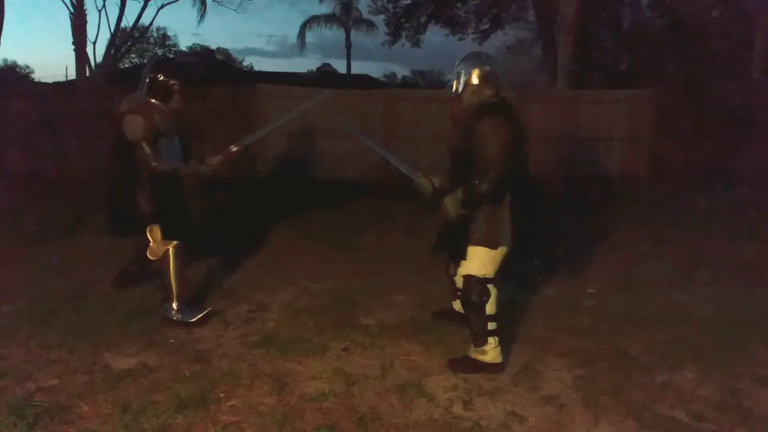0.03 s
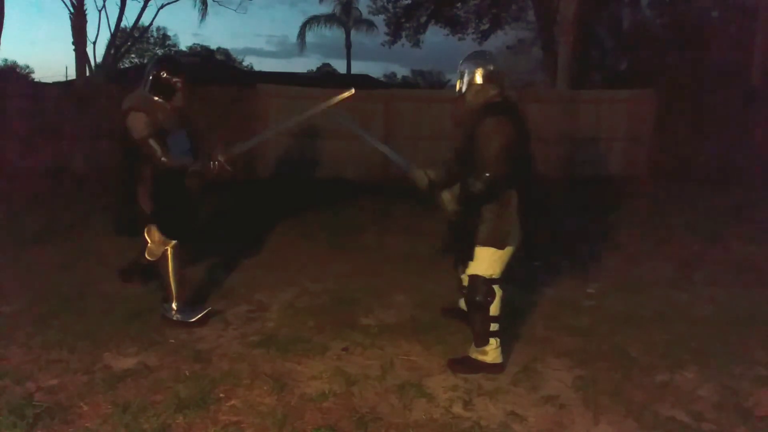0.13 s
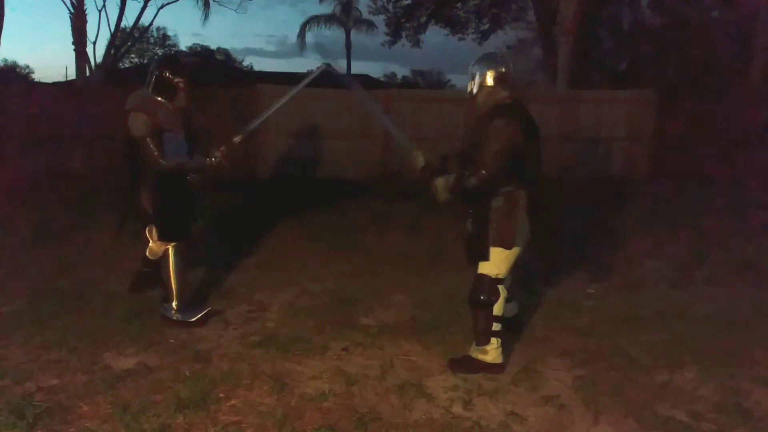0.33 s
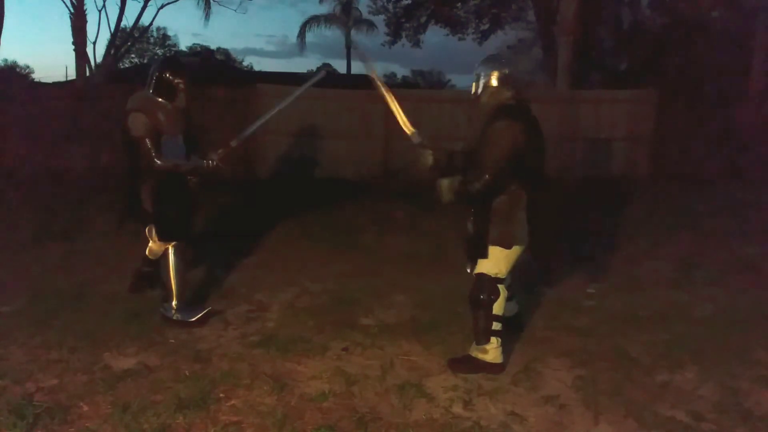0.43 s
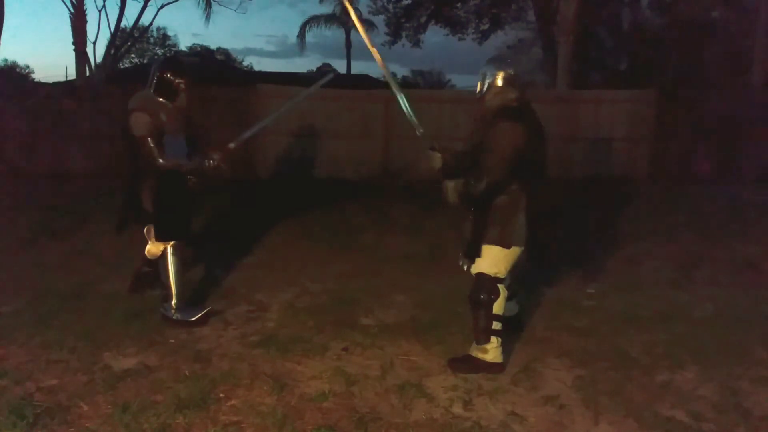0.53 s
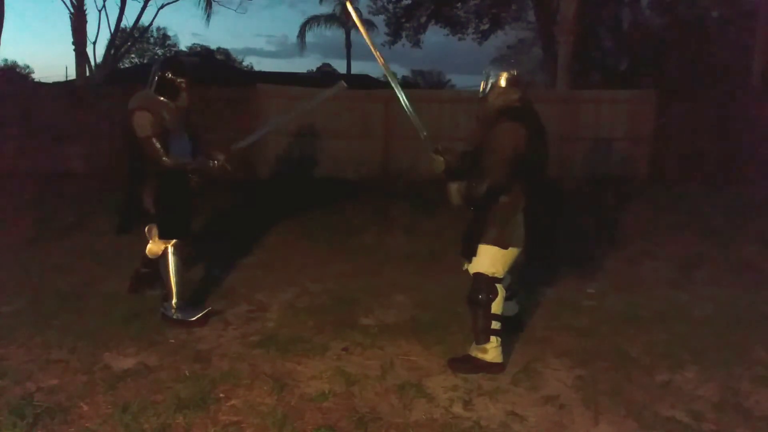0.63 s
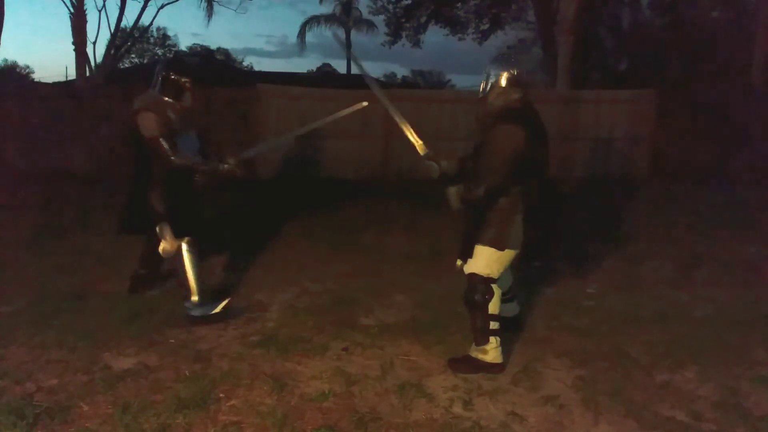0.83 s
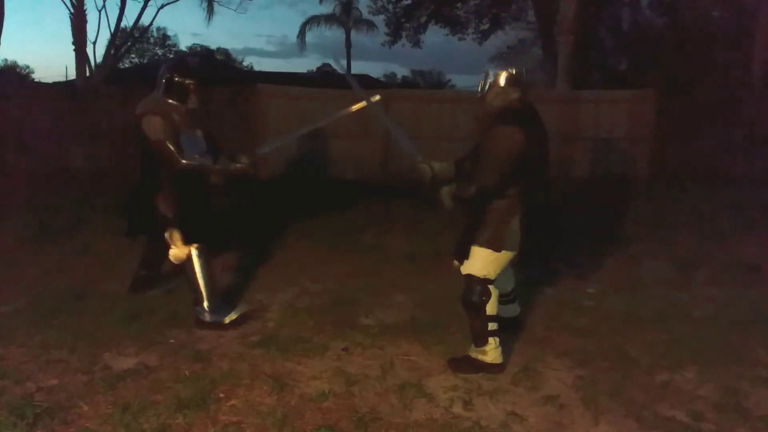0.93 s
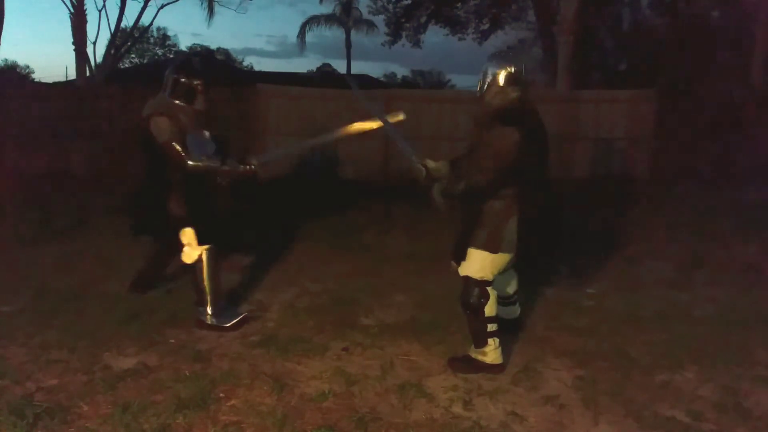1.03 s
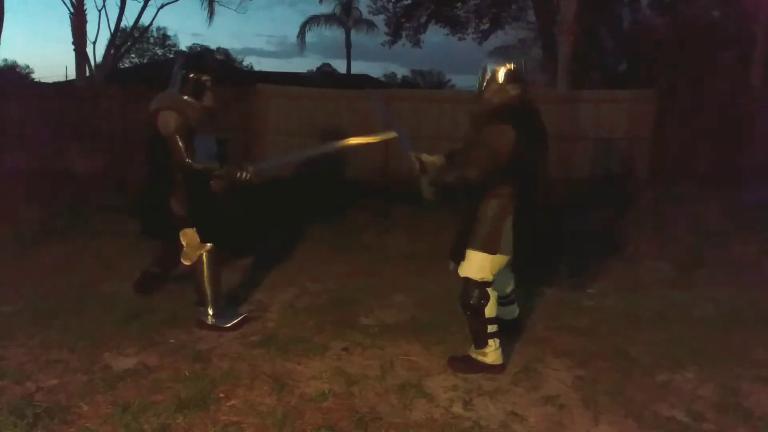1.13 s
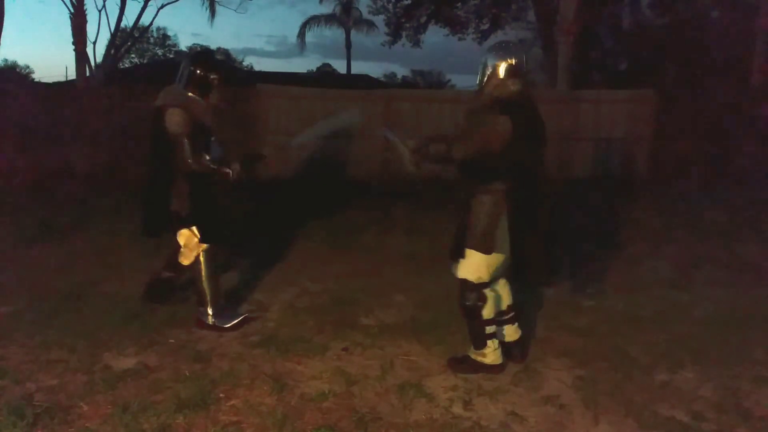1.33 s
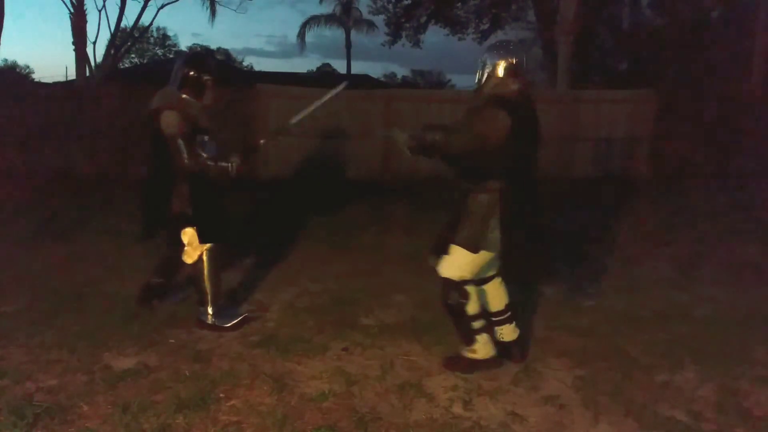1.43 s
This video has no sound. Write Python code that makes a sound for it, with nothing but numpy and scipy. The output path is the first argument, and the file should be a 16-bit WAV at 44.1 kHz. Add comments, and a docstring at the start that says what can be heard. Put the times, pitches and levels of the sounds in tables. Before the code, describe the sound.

Steel swords clash, slide edge on edge and ring, then clash again and grind briefly. Armour plates clink, mail jingles and feet scuff grass faintly, with a short echo in a quiet backyard.

```python
"""Two armoured fighters spar with steel swords in a fenced backyard at dusk, over a faint rumble.
Plates clink and feet scuff the grass, then at 0.22 s the blades clash, chatter, slide edge on edge
and ring out. Mail jingles as the fighters shift their feet. At 1.04 s the swords clash again, grind
briefly and are choked, and a blade pinched at the guard sings. Steps, plates and mail close the scene.
Fence and house throw back a short echo throughout."""
import sys
import numpy as np
from scipy import signal
from scipy.fft import rfft, irfft
from scipy.io import wavfile

SR = 44100
rng = np.random.default_rng(int(sys.argv[2]) if len(sys.argv) > 2 else 0)


def wav_record(signal):
    """Record a signal, one row per channel, as 16-bit PCM in the file named by sys.argv[1]."""
    frames = np.transpose(np.atleast_2d(signal))
    bounded = np.clip(frames, -1, 1)
    # unit amplitude maps onto the largest positive 16-bit level
    quanta = np.round(bounded * 32767).astype(np.int16)
    wavfile.write(sys.argv[1], SR, quanta)


N = 66150
T = np.arange(N) / SR
HZ = np.maximum(np.arange(N // 2 + 1) * SR / N, 1)
LEFT_RIGHT = np.array([[1], [-1]])  # adds on the left, subtracts on the right
BODY_LAG_MS = -.14  # the left ear leads


def from_db(db):
    """Decibels to gain."""
    return 10 ** (np.asarray(db) / 20)


def rms_one(x):
    """Scale to rms 1."""
    return x / np.sqrt(np.mean(x ** 2) + 1e-20)


def at_hz(points, hz):
    """Read a table on a log-frequency axis."""
    freqs, values = np.transpose(points)
    return np.interp(np.log(hz), np.log(freqs), values)


def convolve(x, response):
    """Pass a sound through a stereo response."""
    return signal.fftconvolve(np.atleast_2d(x), response, axes=1)[:, :N]


def decay(start, t60):
    """Hard attack, then a fall of 60 dB every t60 seconds."""
    return (T >= start) * from_db(-60 * np.maximum(T - start, 0) / t60)


def swells(rows):
    """Smooth rises and falls of level, summed in power."""
    power = 0
    for centre, db, half in rows:
        position = np.clip((T - centre) / (2 * half), -1, 1)
        power = power + (from_db(db) * np.cos(np.pi / 2 * position) ** 2) ** 2
    return np.sqrt(power)


def curve(rows):
    """Gain that rides a level curve, silent outside it."""
    times, db = np.transpose(rows)
    return from_db(np.interp(T, times, db)) * (T >= times[0]) * (T <= times[-1])


def lagged(x, ms):
    """Delay the left channel against the right."""
    return np.array([irfft(rfft(x[0]) * np.exp(-2j * np.pi * HZ * ms / 1000), N), x[1]])


def clicks(per_s, spread_db):
    """Random clicks of uneven size; rms 1."""
    sizes = from_db(spread_db * np.minimum(rng.exponential(1, N), 4)) * rng.choice([-1, 1], N)
    return rms_one(sizes * (rng.random(N) < per_s / SR))


def stored(drive, t60):
    """Amplitude of something that gathers energy from a drive and loses it steadily."""
    kept = from_db(-120 / (t60 * SR))
    return np.sqrt(signal.lfilter([1 - kept], [1, -kept], drive ** 2 + 1e-18))


def grains(per_s, spread_db, t60):
    """Envelope of many tiny collisions."""
    return stored(clicks(per_s, spread_db), t60)


def steel_ripple(depth_db, spacing_hz=55, from_hz=1800):
    """Peaks and valleys, in dB, that crowded, damped resonances of steel put on a contact noise."""
    knots = np.arange(0, SR, spacing_hz)
    heights = np.clip(rng.standard_normal(len(knots)), -2, 2)
    return depth_db * HZ ** 2 / (HZ ** 2 + from_hz ** 2) * np.interp(HZ, knots, heights)


# Stereo image of the noises. Each row: frequency in Hz, left-right correlation.
STEREO_LIKENESS = [(50, 0.97), (500, 0.98), (2000, 0.96), (8000, 0.13), (16000, 0.18)]


def noise(spectrum, lift_db=0):
    """Coloured stereo noise, narrow in the bass and wide on top; rms 1."""
    mid, side = rfft(rng.standard_normal((2, N)))
    alike = np.clip(at_hz(STEREO_LIKENESS, HZ), 0, 1)
    both = np.sqrt(1 + alike) * mid + np.sqrt(1 - alike) * side * LEFT_RIGHT
    return rms_one(irfft(both * from_db(at_hz(spectrum, HZ) + lift_db), N))


# Tone of the outdoor bed. Each row: frequency in Hz, relative level in dB.
AIR_EQ = [(20, -11.5), (55, 3.5), (100, -7.5), (160, 2.5), (220, -18.5), (700, -18), (2000, -19.5),
          (6000, -26), (11000, -22.5), (16000, -22)]


def evening_air(level_db=-60.5):
    """A faint, steady rumble with a trace of hiss."""
    return from_db(level_db) * lagged(noise(AIR_EQ), BODY_LAG_MS)


# Tone of the echo off fence and house. Each row: frequency in Hz, gain in dB.
ECHO_EQ = [(100, -9.5), (400, -3.5), (1200, -4), (4000, -4.5), (9000, -11.5), (16000, -11.5)]
# Length of its tail. Each row: frequency in Hz, seconds to fall 60 dB.
ECHO_T60 = [(100, 0.3), (1000, 0.49), (5000, .39), (15000, .28)]


def yard_echo(x, build_s=0.038, alike_below_hz=900):
    """Scattered echoes build up quickly and die away, the treble first."""
    left, other = rfft(rng.standard_normal((2, N)))
    shared = 1 / np.sqrt(1 + (HZ / alike_below_hz) ** 2)
    white = np.array([left, shared * left + np.sqrt(1 - shared ** 2) * other])
    edges = np.geomspace(60, 18000, 13)
    response = 0
    for low, high in zip(edges, edges[1:]):
        hz = np.sqrt(low * high)
        band = irfft(white * (HZ >= low) * (HZ < high), N) * from_db(at_hz(ECHO_EQ, hz))
        tail = decay(0, at_hz(ECHO_T60, hz)) * (1 - np.exp(-T / build_s))
        response = response + band * tail / np.sqrt(np.sum(tail ** 2))
    return convolve(x, response)


# Scuffs of feet and padding, then footfalls. Each row: centre in seconds, level in dB,
# half length in seconds.
SCUFF_CUES = [(0.028, -48, 0.015), (0.065, -48.5, 0.019), (0.545, -52, 0.025), (0.567, -47.5, 0.016),
              (0.822, -58, 0.022), (0.912, -59.5, 0.0071), (0.955, -62, 0.012), (1.098, -40.5, 0.011),
              (1.20, -46.5, 0.011), (1.279, -43.5, 0.0059), (1.37, -56, 0.11)]
STEP_CUES = [(0.53, -55, 0.042), (1.16, -57, 0.024), (1.35, -49.5, 0.043), (1.447, -49, 0.025)]
# Tone of a scuff and of a footfall. Each row: frequency in Hz, relative level in dB.
SCUFF_EQ = [(60, -35), (250, -1), (800, -0.5), (1300, -8), (2500, -10), (6000, -14.5), (16000, -45)]
STEP_EQ = [(20, -15), (50, 2), (90, -9), (140, 4), (220, -15.5), (600, -13), (3000, -70)]


def feet():
    """Soles crush the grass and weight lands on the turf."""
    crunch = grains(per_s=900, spread_db=2.5, t60=0.04)
    grass = swells(SCUFF_CUES) * crunch * noise(SCUFF_EQ)
    turf = swells(STEP_CUES) * noise(STEP_EQ)
    return lagged(grass + turf, BODY_LAG_MS)


# Plate knocks on plate. Each row: start in seconds, relative level in dB.
CLINK_CUES = [(0.0, -40.5), (0.024, -44), (0.057, -52.5), (0.67, -49), (0.797, -55.5), (0.845, -59),
              (0.908, -53.5), (0.943, -45.5), (1.38, -40), (1.465, -36)]
# Mail shifts with a movement. Each row: centre in seconds, level in dB, half length in seconds.
JINGLE_CUES = [(0.04, -57.5, 0.059), (0.535, -43.5, 0.018), (0.725, -59, 0.011), (0.822, -51.5, 0.025),
               (1.32, -55.5, 0.13), (1.46, -35, 0.14)]
# Tone of the plates and of the mail. Each row: frequency in Hz, relative level in dB.
PLATE_EQ = [(800, -21), (2500, -8.5), (5000, 3.5), (7500, -0.5), (10000, -4), (13500, 1), (16000, 1.5)]
MAIL_EQ = [(1000, -17.5), (3000, -13.5), (6000, -22.5), (9300, -12.5), (10500, 1), (12800, 1.5),
           (16000, -3.5)]


def armour(tick_t60=.018, ring_t60=.07, ring_gain=0.61, pan_db=1.4):
    """Plates clink with a sharp tick and a short ring; mail rings tumble over each other."""
    knocks = sum(from_db(db) * (decay(start, tick_t60) + ring_gain * decay(start, ring_t60))
                 for start, db in CLINK_CUES)
    plates = knocks * grains(per_s=5000, spread_db=1.8, t60=0.005) * noise(PLATE_EQ)
    tumble = swells(JINGLE_CUES) * grains(per_s=1500, spread_db=2.2, t60=.035)
    mail = tumble * noise(MAIL_EQ, steel_ripple(depth_db=3.5))
    return lagged(plates + mail, BODY_LAG_MS) * from_db(pan_db * LEFT_RIGHT)


# The two clashes. Each row: start in seconds, left-ear lag of the crack in ms, thud level in dB.
CLASH_CUES = [(0.2247, 0.14, -29), (1.0411, -0.077, -33)]


def thuds(hz=101.3, t60=0.043, pan_db=4):
    """A short low thud gives each clash its weight, stronger on the left."""
    thud = sum(from_db(db) * decay(start, t60) * np.sin(2 * np.pi * hz * (T - start))
               for start, _, db in CLASH_CUES)
    return lagged(thud * from_db(pan_db * LEFT_RIGHT), BODY_LAG_MS)


# Tone of the swords' shimmer. Each row: frequency in Hz, relative level in dB.
SHIMMER_EQ = [(1000, -17), (2000, -2.5), (2800, -8.5), (3500, -8.5), (6000, 3.5), (9000, 6), (11500, 7.5),
              (16000, 4)]


def shimmer_response(count=180, t60_at_6khz=0.15, damping=0.12):
    """Many weak modes of blades and guards ring, the high ones dying sooner; rms 1 at the start."""
    out, t = np.zeros((2, N)), T[:N // 2]
    places = (np.arange(count) + rng.random(count)) / count
    scatter = rng.standard_normal((count, 3))
    phases = rng.uniform(0, 2 * np.pi, count)
    for place, (size, life, width), phase in zip(places, scatter, phases):
        hz = 1000 + place ** 1.15 * 15000
        t60 = t60_at_6khz * (6000 / hz) ** damping * np.exp(0.17 * np.clip(life, -2, 2))
        fall = from_db(at_hz(SHIMMER_EQ, hz) + 4.0 * size - 60 * t / t60)
        out[:, :len(t)] += fall * np.sin(2 * np.pi * hz * t + phase + 0.86 * width * LEFT_RIGHT)
    return out / np.sqrt(np.mean(out[:, :SR // 100] ** 2))


# Edge rubs on edge: a slide after the first clash, a grind after the second.
# Each row: time in seconds, relative level in dB.
SLIDE_FORCE = [(0.245, -47), (0.28, -32), (0.325, -45), (0.36, -30), (0.395, -25), (0.428, -30),
               (0.45, -61), (0.47, -70)]
GRIND_FORCE = [(1.055, -34.5), (1.09, -30), (1.13, -36.5), (1.165, -40), (1.195, -43), (1.215, -39),
               (1.235, -46.5), (1.255, -39.5), (1.30, -49.5), (1.5, -59.5)]
# Tone of the rasp. Each row: frequency in Hz, relative level in dB.
RASP_EQ = [(200, -8), (600, -5.5), (1500, -8.5), (2200, -14), (2800, -30.5), (4000, -0.5), (6000, 4.5),
           (9000, -5), (12000, 6), (16000, -4.5)]


def rubbing(force, shimmer, rasp_db, ring_db=-.5):
    """Nicks in the edges catch in quick succession: a dry rasp, and a drive for the weak modes."""
    catches = curve(force) * clicks(per_s=3000, spread_db=2.0)
    ring = convolve(catches, shimmer / np.sqrt(np.sum(shimmer ** 2) / 2))
    rasp = stored(catches, t60=.005) * noise(RASP_EQ, steel_ripple(depth_db=7))
    return from_db(ring_db) * ring + from_db(rasp_db) * rasp


# A blade is pinched against the guard. Each row: centre in seconds, relative level in dB,
# half length in seconds.
PINCH_CUES = [(1.205, -1, .014), (1.257, 0, .009)]
# The modes it sings with. Each row: frequency in Hz, level of the stronger tone in dB.
PINCH_MODES = [(4554, -47), (11540, -51), (12892, -46), (13368, -48), (14881, -50)]


def pinched_ring(t60=.33, beat_hz=17, width_rad=1.0):
    """Caught near the guard, a blade sings with a few modes, each a pair of close tones that beat."""
    swing = stored(swells(PINCH_CUES), t60)
    out = 0
    for hz, db in PINCH_MODES:
        phase = 2 * np.pi * (hz * T + rng.random()) + rng.normal(0, width_rad) * LEFT_RIGHT
        beat = 2 * np.pi * (beat_hz * T + rng.random())
        out = out + from_db(db) * (np.sin(phase) + .5 * np.sin(phase + beat))
    return out * swing / swing.max()


# Strong modes of the blades. Each row: frequency in Hz, seconds to fall 60 dB, then relative
# levels in dB for the first clash, the second clash and the slide.
STRONG_MODES = [(1168, 0.52, -39, -48, -68), (1366, 0.55, -42, -47, -74), (1872, 1.3, -52, -60, -55),
                (2050, 0.45, -39, -47, -55), (2840, 0.45, -52, -41, -57), (3172, 0.49, -36, -50, -72),
                (3647, 0.4, -44, -33, -60), (3675, 0.48, -42, -25, -56), (3725, 0.7, -61, -43, -53),
                (4033, 0.5, -57, -59, -53), (4095, 0.4, -33, -36, -47), (4165, 0.4, -31, -36, -55),
                (4364, 0.58, -46, -56, -46), (5049, 0.58, -50, -46, -45), (5290, 0.33, -30, -55, -50),
                (5665, 0.39, -28, -29, -46), (5754, 0.41, -53, -38, -41), (6057, 0.38, -51, -40, -39),
                (6119, 0.48, -28, -39, -41), (6188, 0.36, -26, -33, -58), (6493, 0.44, -50, -51, -35),
                (6716, 0.16, -21, -46, -58), (6874, 0.2, -35, -28, -42), (7275, 0.32, -31, -35, -41),
                (7432, 0.27, -34, -37, -37), (7912, 0.13, -20, -39, -45), (8053, 0.24, -37, -31, -32),
                (8478, 0.41, -28, -32, -58), (8520, 0.17, -18, -29, -45), (8718, 0.24, -33, -34, -36),
                (9378, 0.29, -35, -32, -39), (9835, 0.33, -34, -36, -62), (10014, 0.28, -51, -25, -40),
                (10370, 0.18, -36, -41, -38), (10641, 0.2, -54, -18, -41), (10844, 0.18, -44, -32, -36),
                (11040, 0.4, -31, -43, -62), (11160, 0.33, -26, -41, -66), (11328, 0.16, -46, -25, -33),
                (11540, 0.36, -28, -36, -51), (11838, 0.17, -46, -47, -33), (12528, 0.32, -31, -32, -62),
                (12895, 0.22, -38, -35, -40), (13345, 0.18, -30, -33, -37)]
# In the grind the edges bite again and drive the second clash's modes.
# Each row: frequency in Hz, relative drive in dB.
BITE_EQ = [(3700, 4), (5600, -6), (10000, -14)]
BITE_S, BITE_HALF_S = 1.115, 0.0073
CHOKE_S, CHOKE_DB_PER_S = 1.146, 117  # pressed together, the blades stop ringing


def blade_ring(clash_trim_db=-3.5, slide_trim_db=-1, bite_trim_db=-9,
               wander_hz=3, width_rad=0.41, pan_db=.6):
    """The strong modes are struck by each clash, pumped up by rubbing and finally choked."""
    slide, bite = curve(SLIDE_FORCE), swells([(BITE_S, 0, BITE_HALF_S)])
    rub = slide / slide.max() + bite
    out = 0
    for hz, t60, first_db, second_db, slide_db in STRONG_MODES:
        phase = 2 * np.pi * (hz * T + rng.random()) + rng.normal(0, width_rad) * LEFT_RIGHT
        struck = from_db(first_db + clash_trim_db) * decay(CLASH_CUES[0][0], t60)
        struck += from_db(second_db + clash_trim_db) * decay(CLASH_CUES[1][0], t60)
        bite_db = second_db + at_hz(BITE_EQ, hz)
        pumped = 0
        for drive, db in ((slide, slide_db + slide_trim_db), (bite, bite_db + bite_trim_db)):
            swing = stored(drive, t60)
            pumped = pumped + from_db(db) * swing / swing.max()
        # the phase drifts only while the edges rub
        wander = np.cumsum(rng.standard_normal(N) * rub) * np.sqrt(2 * np.pi * wander_hz / SR)
        out = out + struck * np.sin(phase) + pumped * np.cos(phase + wander)
    choke = from_db(-CHOKE_DB_PER_S * np.maximum(T - CHOKE_S, 0))
    return out * choke * from_db(pan_db * LEFT_RIGHT)


# Steel hits steel. Each row: start in seconds, crack level in dB, shimmer level in dB,
# brightest pitch in Hz, boost at that pitch in dB.
HIT_CUES = [(0.225, -11.5, -22, 6630, 16.5), (0.231, -16.5, -23, 5470, 9.5),
            (0.2690, -18.5, -20, 11200, 18.5), (1.0414, -11, -26, 10060, 16.5),
            (1.051, -13, -23.5, 10700, 12.5), (1.213, -31.5, -56, 5650, 26)]
# Tone of the crack. Each row: frequency in Hz, relative level in dB.
CRACK_EQ = [(200, -15.5), (600, -8.5), (1500, -6), (2500, -7), (3500, 2), (6000, 3.5), (9000, -4.5),
            (14000, 0), (16000, -6.5)]


def blade_hits(shimmer, crack_t60=0.084, boost_octaves=.16):
    """Each touch is a chattering crack, brightest around one pitch, that sets the weak modes ringing."""
    cracks, taps = 0, np.zeros(N)
    for start, crack_db, shimmer_db, hz, boost_db in HIT_CUES:
        boost = boost_db * np.exp(-.5 * (np.log2(HZ / hz) / boost_octaves) ** 2)
        _, lag_ms, _ = min(CLASH_CUES, key=lambda clash: abs(clash[0] - start))  # the nearest clash
        chatter = grains(per_s=4400, spread_db=0.0, t60=0.0042)
        steel = lagged(noise(CRACK_EQ, boost + steel_ripple(depth_db=4)), lag_ms)
        cracks = cracks + from_db(crack_db) * decay(start, crack_t60) * chatter * steel
        taps[int(start * SR)] = from_db(shimmer_db)
    return cracks + convolve(taps, shimmer)


def scene():
    """Swords, armour and feet echo in the yard, over the evening air."""
    shimmer = shimmer_response()
    slide = rubbing(SLIDE_FORCE, shimmer, rasp_db=-5)
    grind = rubbing(GRIND_FORCE, shimmer, rasp_db=5.5)
    steel = blade_hits(shimmer) + slide + grind
    ring = blade_ring() + pinched_ring()
    bodies = armour() + feet()
    echoes = yard_echo(steel + from_db(-10.0) * ring + from_db(-5.5) * bodies)
    return evening_air() + echoes + bodies + thuds() + ring + steel


def record(dry, ceiling=1.1, cutoff_hz=15800):
    """Soft saturation rounds the peaks and a steep low-pass cuts the very top."""
    rounded = ceiling * np.tanh(dry / ceiling)
    return signal.sosfilt(signal.ellip(12, .2, 80, cutoff_hz, fs=SR, output="sos"), rounded)


dry = scene()
out = record(dry)
wav_record(out)
```